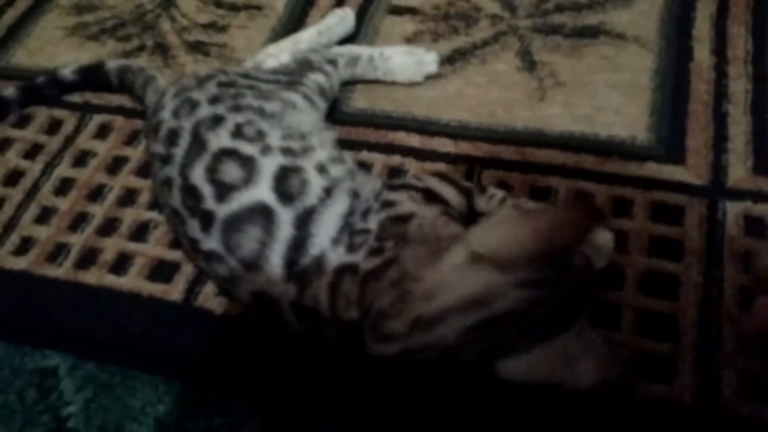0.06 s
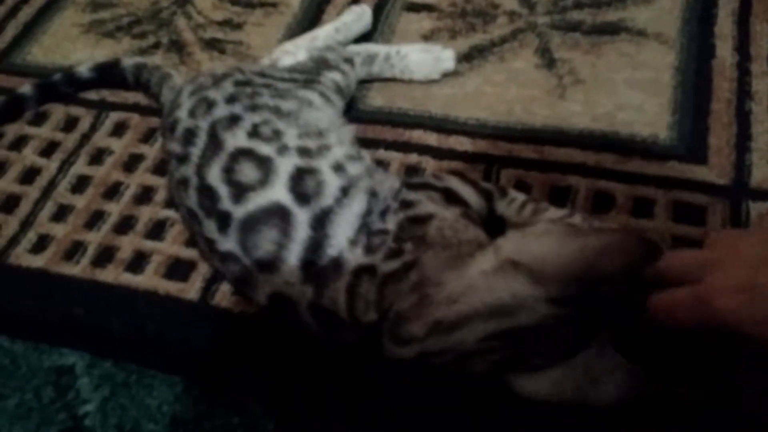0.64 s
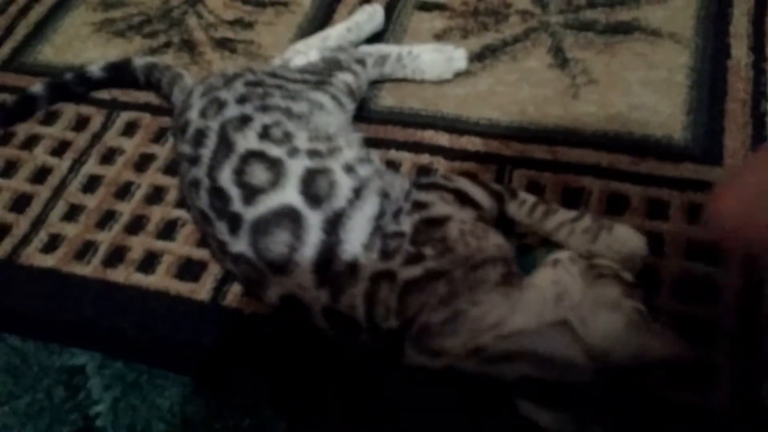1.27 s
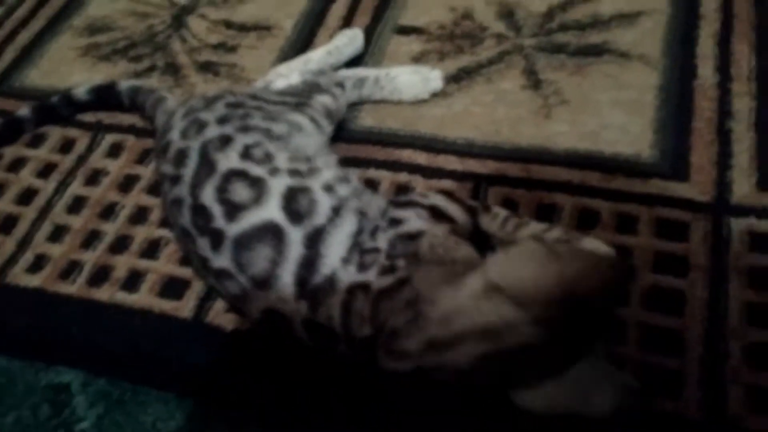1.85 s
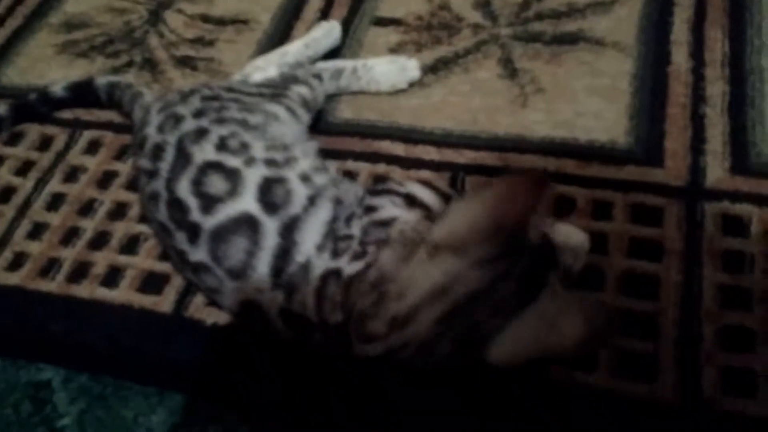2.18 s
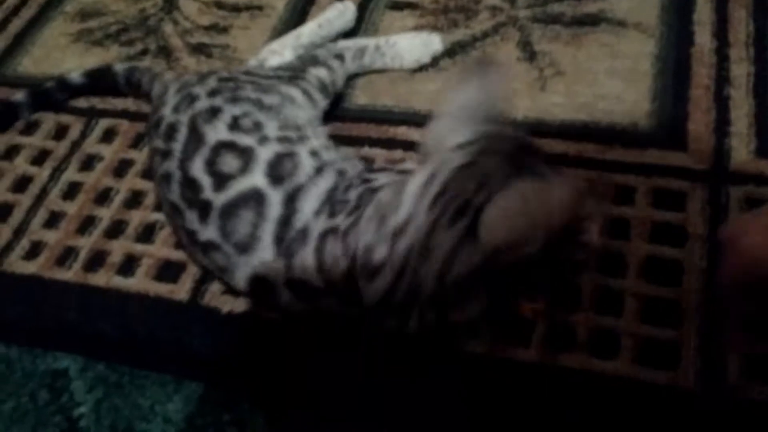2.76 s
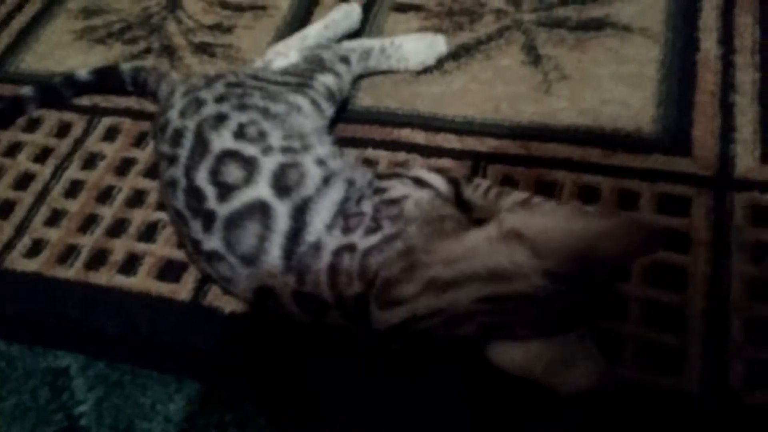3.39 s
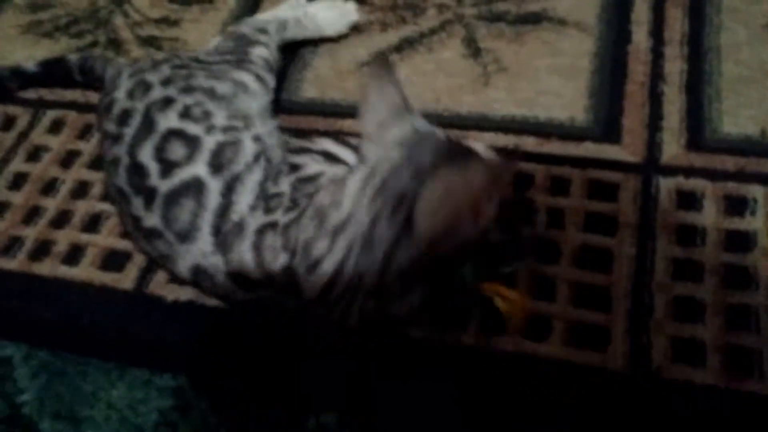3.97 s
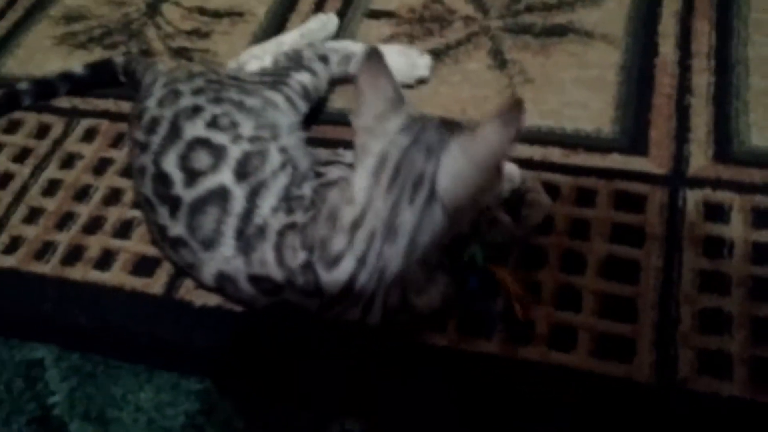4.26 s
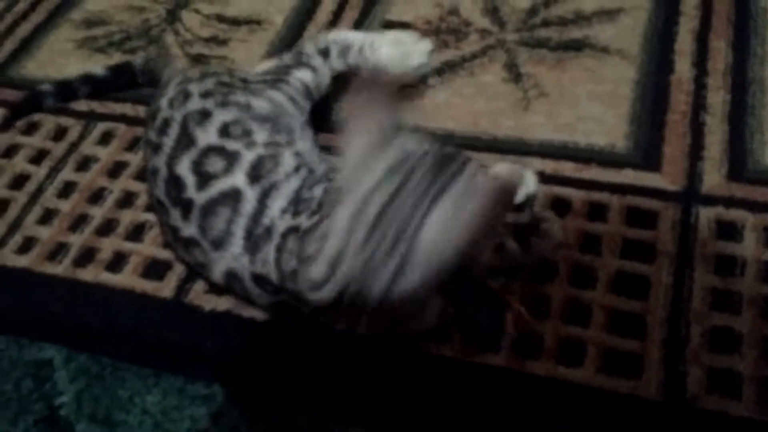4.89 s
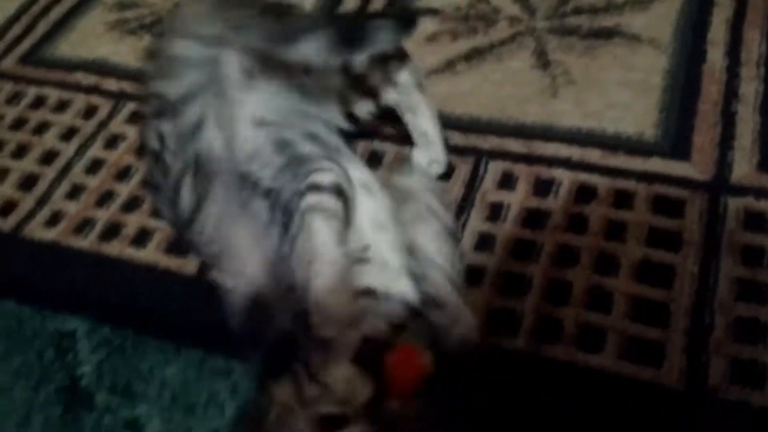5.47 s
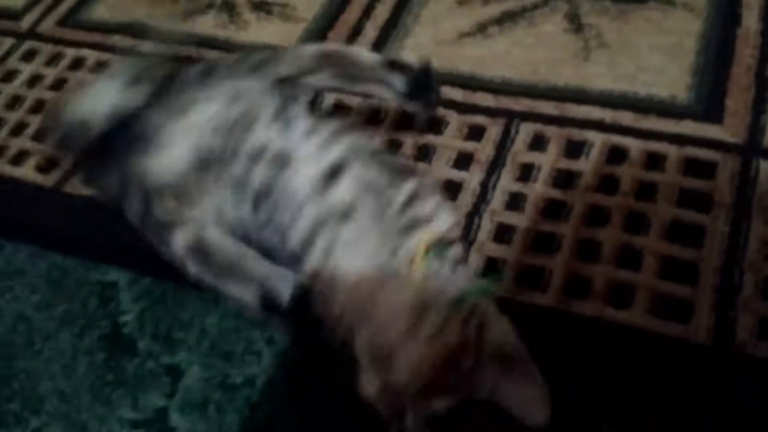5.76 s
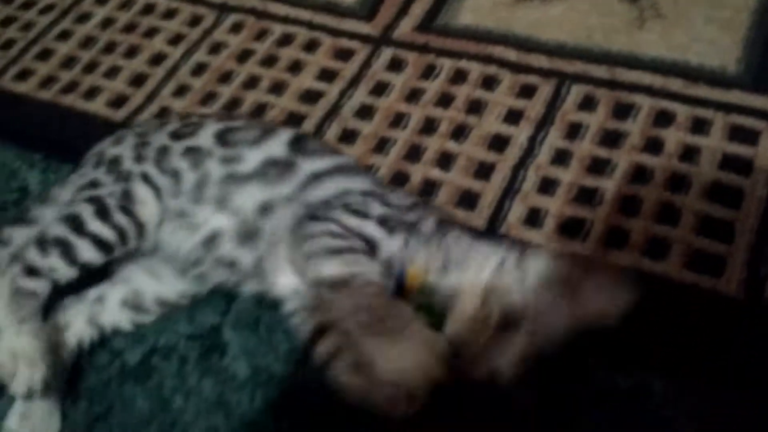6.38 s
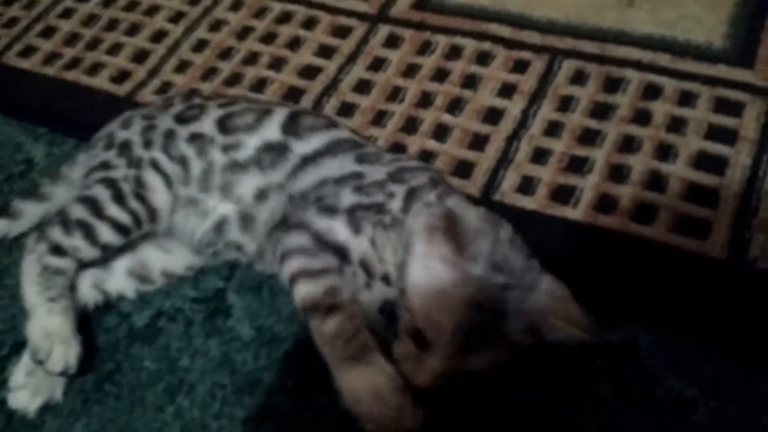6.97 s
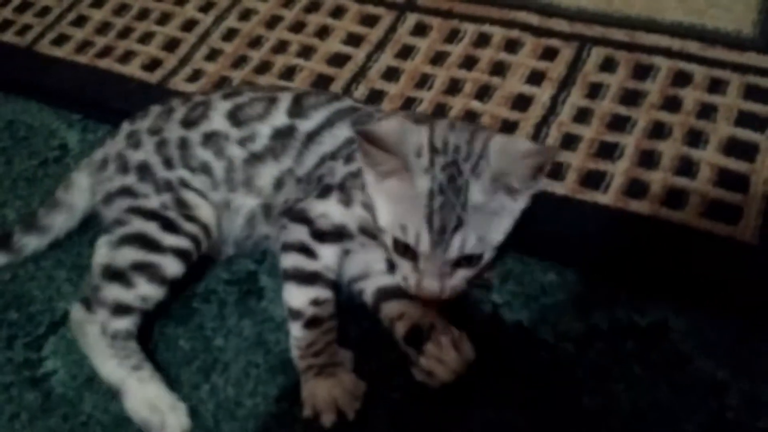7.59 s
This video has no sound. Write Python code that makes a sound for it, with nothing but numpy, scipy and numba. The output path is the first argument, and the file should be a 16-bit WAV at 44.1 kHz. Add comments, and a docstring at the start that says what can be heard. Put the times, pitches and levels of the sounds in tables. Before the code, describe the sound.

A kitten growls twice, low and rough, then sniffs and rolls over on a carpet with rustles and bumps.

```python
"""A kitten growls twice over its toy, sniffs, then rolls over on a carpet with rustles, snags and bumps.
The growl is an uneven train of vocal-fold pulses ringing in the throat and mouth; each time, the mouth
opens fast into a snarl and closes slowly. Underneath sits a quiet room with a little mains hum.
A hand-held camera with two microphone ports adds hiss, handling rumble and a faint regular tick."""
import sys
import numpy as np
from scipy import signal
from scipy.fft import rfft, irfft, next_fast_len
from scipy.io import wavfile
from scipy.ndimage import uniform_filter1d
from numba import njit

SR = 44100
rng = np.random.default_rng(int(sys.argv[2]) if len(sys.argv) > 2 else 0)


def persist_wave(psi):
    """Save psi, clipped to +-1, as 16-bit WAV."""
    counts = np.round(np.clip(psi, -1, 1) * 32767).astype(np.int16)
    wavfile.write(sys.argv[1], SR, np.atleast_2d(counts).T)


N = 336924
TIME = np.arange(N) / SR
LEFT_RIGHT = np.array([[1], [-1]])   # a pan is added on the left and taken off on the right


def from_db(db):
    """Decibels to gain."""
    return 10 ** (np.asarray(db) / 20)


def rms_one(x):
    """Scale to unit power."""
    return x / np.sqrt(np.mean(x ** 2) + 1e-20)


def evened(x):
    """Ride the level to unit power over every few cycles."""
    return x / np.sqrt(np.abs(uniform_filter1d(x ** 2, size=1500)) + 1e-12)


def at_hz(points, hz):
    """Read a curve on a log-frequency axis."""
    f, value = np.transpose(points)
    return np.interp(np.log(hz + 1e-3), np.log(f), value)


def in_time(tables):
    """Each column of several tables as one curve in time."""
    times, *columns = np.transpose(np.concatenate(tables))
    return [np.interp(TIME, times, column) for column in columns]


def swells(tables):
    """A gain envelope from the time and level columns of several tables, silent between them."""
    gain = sum(from_db(np.interp(TIME, *np.transpose(t)[:2], -np.inf, -np.inf)) for t in tables)
    return np.abs(uniform_filter1d(gain, size=200))


def strokes(rows, arch=.9):
    """Arched envelopes of movements that speed up and slow down again."""
    return sum(from_db(db) * np.abs(np.sin(np.pi * np.clip((TIME - start) / length, 0, 1))) ** arch
               for start, length, db in rows)


def burst(start, attack_s, decay_s):
    """An envelope that rises and dies away."""
    age = np.maximum(TIME - start, 0)
    return (1 - np.exp(-age / attack_s)) * np.exp(-np.minimum(age / decay_s, 20))


def waver(rate_hz, depth_db):
    """A factor that wanders at random around 1."""
    return from_db(depth_db * np.interp(TIME * rate_hz, np.arange(1000), rng.standard_normal(1000)))


def coloured(x, spectrum):
    """Shape a signal with an EQ curve; unit power."""
    size = next_fast_len(N)
    gain = from_db(at_hz(spectrum, np.fft.rfftfreq(size, 1 / SR)))
    return rms_one(irfft(rfft(x, size) * gain, size)[..., :N])


def dipped(x, dips):
    """Cut bell-shaped dips into a spectrum."""
    size = next_fast_len(N)
    f = np.fft.rfftfreq(size, 1 / SR)
    bells = [1 - (1 - from_db(db)) * np.exp(-((f - hz) / width) ** 2) for hz, width, db in dips]
    return irfft(rfft(x, size) * np.prod(bells, axis=0), size)[:N]


def butter(x, hz, kind, order=2):
    """Causal Butterworth filter."""
    sos = signal.butter(order, np.minimum(hz, SR * 9 / 20), kind, fs=SR, output="sos")
    return signal.sosfilt(sos, x + 1e-18)


def resonate(x, hz, width_hz):
    """A steady resonance with gain 1 at its peak."""
    r = np.exp(-np.pi * width_hz / SR)
    feedback = [1, -2 * r * np.cos(2 * np.pi * hz / SR), r * r]
    return signal.lfilter(np.array([1, 0, -1]) * (1 - r * r) / 2, feedback, x + 1e-18)


def resonate_twice(x, hz, width_hz):
    """Two equal resonances in series, for steeper skirts."""
    return resonate(resonate(x, hz, width_hz), hz, width_hz)


@njit
def glide(x, hz, width_hz):
    """A resonance whose centre moves."""
    y, r = np.zeros(len(x)), np.exp(-np.pi * width_hz / SR)
    for i in range(2, len(x)):
        drive = (1 - r * r) / 2 * (x[i] - x[i - 2])
        y[i] = drive + 2 * r * np.cos(2 * np.pi * hz[i] / SR) * y[i - 1] - r * r * y[i - 2]
    return y


def add(track, start, sound):
    """Mix a short sound in at a time."""
    i = int(start * SR)
    track[i:i + len(sound)] += sound[:N - i]


# Dark murmur of the room's air: (frequency [Hz], level [dB])
ROOM_TONE_EQ = [(30, 9), (90, -9), (160, -4.5), (225, -0.5), (275, 7), (325, -6), (400, 2), (500, -12),
                (900, -11.5), (1200, -13), (1900, -23.5), (2700, -48), (4200, -21.5), (6500, -26),
                (16000, -38.5)]

def room_tone(level_db=-55):
    """The air in the room, a steady bed of low noise."""
    return from_db(level_db) * coloured(rng.standard_normal(N), ROOM_TONE_EQ)


# Partials of the hum: (frequency [Hz], level [dB])
HUM_PARTIALS = [(120, -65), (600, -77.5)]

def mains_hum():
    """The mains hums in two steady sine tones."""
    return sum(from_db(db) * np.sqrt(2) * np.sin(2 * np.pi * hz * TIME) for hz, db in HUM_PARTIALS)


# The camera's noise floor: (frequency [Hz], level [dB])
HISS_EQ = [(15, -14), (42, 6), (62, 0), (150, -11.5), (500, -14), (1000, -23.5), (2600, -21), (3800, -20),
           (5200, -27), (6500, -23), (9000, -26.5), (16000, -29.5)]

def camera_hiss(level_db=-56, pan_db=-1):
    """Each channel of the camera makes its own steady noise."""
    return from_db(level_db + pan_db * LEFT_RIGHT) * coloured(rng.standard_normal((2, N)), HISS_EQ)


def camera_ticks(start_s=.0285, period_s=.10241, level_db=-54, pan_db=12.5, uneven_db=3):
    """A faint tick from the camera's electronics, on the left, about ten times a second."""
    at = (np.arange(start_s, N / SR, period_s) * SR).astype(int)
    pulses = np.zeros(N)
    pulses[at] = from_db(uneven_db * rng.uniform(-0.69, 1, len(at)))
    tick = resonate_twice(pulses, hz=4100, width_hz=900)
    return tick / np.abs(tick).max() * from_db(level_db + pan_db * LEFT_RIGHT)


# Bumps on the camera: (time [s], level [dB], decay [s])
HANDLING_BUMPS = [(1.058, -43, 0.12), (2.35, -43, 0.038), (2.857, -62, 0.4), (3.595, -43.5, 0.09),
                  (4.87, -48, 0.13), (6.131, -44, 0.14), (7.405, -44, 0.13)]
# Their sub-bass weight: (frequency [Hz], level [dB])
BUMP_EQ = [(15, -33), (30, -11), (41, 11.5), (58, 1), (100, -11), (200, -13), (500, -59), (2000, -68)]

def handling_bumps(attack_s=0.00076, stereo_spread=0.79, pan_db=-3.5):
    """Handling shakes the camera: deep rumbles, partly different in each port."""
    shake = coloured(rng.standard_normal(N) + stereo_spread * rng.standard_normal((2, N)), BUMP_EQ)
    envelope = sum(from_db(db) * burst(start, attack_s, decay) for start, db, decay in HANDLING_BUMPS)
    return shake * from_db(pan_db * LEFT_RIGHT) * envelope


def room_reverb(x, t60_s=0.29, wet_db=-15, predelay_s=.004):
    """The short dull tail of a carpeted room, different on each side."""
    age = np.arange(SR // 3) / SR
    tail = butter(rng.standard_normal((2, len(age))), 3200, "low", order=1)
    tail = tail * np.exp(-np.log(1000) * age / t60_s) * (age > predelay_s)
    tail /= np.sqrt(np.sum(tail ** 2) / 2)
    return from_db(wet_db) * signal.fftconvolve(x[None], tail, axes=1)[:, :N]


# Phase between the microphone ports: (frequency [Hz], left lead [rad])
PORT_LEAD = [(30, 1.5), (250, .8), (800, .75), (1200, 0), (1950, -.2), (2350, -3), (3300, -3.2),
             (3900, -5.8), (4400, -6.4), (5400, -9.3), (7000, -12.6), (8300, -15.3), (9800, -18.7),
             (16000, -30.5)]
# Balance between them: (frequency [Hz], left minus right [dB])
PORT_PAN = [(60, -4), (95, -9), (150, -19.5), (240, -6), (380, -8), (600, -6.5), (950, 0.5), (1650, -5),
            (2200, 22), (2800, 21.5), (3770, -1.5), (6300, -6), (9470, -5.5), (15000, -4)]

def ports(x):
    """Sound reaches the left port later in the treble and weaker in the bass."""
    size = next_fast_len(N + 2000)
    hz = np.fft.rfftfreq(size, 1 / SR)
    lean = from_db(at_hz(PORT_PAN, hz))
    pair = np.array([lean * np.exp(1j * at_hz(PORT_LEAD, hz)), np.ones(len(hz))]) * 2 / (1 + lean)
    return irfft(rfft(x, size) * pair, size)[:, :N]


# Body moves: (time [s], length [s], level [dB])
WEIGHT_SHIFTS = [(.68, 0.066, -54.5), (3.58, 0.2, -54.5), (4.2, 0.51, -58), (5.87, .2, -64),
                 (6.0, 0.4, -56), (6.38, 0.12, -62.5), (7.39, 0.17, -59.5)]
# Their muffled tone: (frequency [Hz], level [dB])
SCUFF_EQ = [(60, -58), (170, -3), (280, -1.5), (340, 1.5), (430, 1), (600, -9), (1300, -17), (2500, -25.5),
            (6000, -80)]

def body_scuffs():
    """Dull scuffs as the kitten shifts its weight."""
    envelope = strokes(WEIGHT_SHIFTS) * waver(rate_hz=28, depth_db=2.5)
    return envelope * coloured(rng.standard_normal(N), SCUFF_EQ)


# The body fall: (time [s], level [dB])
FLOP_HITS = [(5.935, -38.5)]
# Modes of its thud: (frequency [Hz], level [dB], time to fall 60 dB [s])
THUD_MODES = [(90, -4, 0.12), (165, -1.5, 0.053), (343, -6.5, 0.11), (420, -6, 0.074)]

def flop():
    """The kitten flops onto the floor with one damped thud."""
    out, age = np.zeros(N), np.arange(SR // 4) / SR
    thud = sum(from_db(db) * np.exp(-np.log(1000) * age / t60) * np.sin(2 * np.pi * hz * age)
               for hz, db, t60 in THUD_MODES)
    for start, db in FLOP_HITS:
        add(out, start, from_db(db) * thud)
    return out


# Crisp tone of carpet fibres: (frequency [Hz], level [dB])
FIBRE_EQ = [(500, -13), (1400, 4), (2500, 8.5), (3900, 9.5), (7000, 10), (9500, 5), (12000, 0), (14500, 1),
            (16000, -34)]

def fibre_slips(per_s, spread_db):
    """Carpet fibres let go at random, mostly weakly; unit power."""
    sizes = rng.choice([-1, 1], N) * from_db(spread_db * np.minimum(rng.exponential(1, N), 4))
    return coloured((rng.random(N) < per_s / SR) * sizes, FIBRE_EQ)


# Drags over the carpet: (time [s], length [s], level [dB])
CARPET_STROKES = [(0.0, 0.25, -61), (.56, 0.12, -67), (1.94, 0.091, -63), (4.2, 0.21, -64),
                  (4.36, .22, -63), (4.63, 0.24, -76), (4.82, 0.22, -60.5), (5.35, 0.19, -63.5),
                  (5.52, 0.074, -59.5), (5.65, 0.34, -57), (5.83, 0.27, -53), (6.07, 0.16, -56.5),
                  (6.21, 0.37, -59.5), (6.54, 0.077, -61.5), (7.01, 0.13, -59), (7.41, 0.13, -58)]

def rustle(fidget_db=-72):
    """Fur and toy rub the carpet in uneven strokes; single fibres tick faintly throughout."""
    envelope = strokes(CARPET_STROKES) * waver(rate_hz=37, depth_db=2.5)
    rubbing = envelope * fibre_slips(per_s=1100, spread_db=1.5)
    return rubbing + from_db(fidget_db) * fibre_slips(per_s=120, spread_db=4.5)


# Claws and teeth catching: (time [s], crack peak [dB], ring [Hz], dullness [dB], crack decay [s])
CLAW_SNAGS = [(1.655, -51, 6900, 16, .004), (2.878, -44, 6280, 16, .001), (3.0094, -34.5, 6300, 13, 0.0017),
              (3.892, -40.5, 6670, -13, 0.00046), (5.4412, -36, 2900, 1.5, .0004),
              (5.668, -41, 7000, -22, .0007), (5.684, -33.5, 6700, -1.5, 0.0019),
              (5.735, -30.5, 7660, -27, 0.0021), (5.8887, -25.5, 6750, -28, 0.0015),
              (5.8923, -28.5, 7240, -9, .0014), (5.8995, -22, 6700, -28, .0012),
              (5.928, -36, 6490, -8, 0.0026), (5.984, -35, 9500, -15, .0006),
              (6.0423, -44, 4220, 8.5, 0.0017), (6.079, -40, 8000, -22, .0004),
              (7.1323, -35, 6900, -2, 0.00046)]

def snags(tail_db=-22, tail_s=.006, ring_db=-2, knock_db=3, brightening=0.206):
    """A claw lets go with a crack and a scratchy tail; a softer catch has more knock and less top."""
    out, age = np.zeros(N), np.arange(SR // 25) / SR
    for start, db, hz, dull_db, crack_s in CLAW_SNAGS:
        envelope = np.exp(-age / crack_s) + from_db(tail_db) * np.exp(-age / tail_s)
        slip = rng.standard_normal(len(age)) * envelope
        ring = from_db(ring_db) * resonate(slip, hz, width_hz=2400)
        top_hz = max(hz, 6000) * from_db(-brightening * min(dull_db, 0))
        crack = butter(butter(slip + ring, 6700, "high", order=1), top_hz, "low", order=3)
        knock = butter(resonate(slip, hz=1400, width_hz=710), 1830, "low", order=3)
        snag = crack + from_db(knock_db + dull_db) * knock
        add(out, start, from_db(db) * snag / np.abs(crack).max())
    return out


# Teeth on the toy: (time [s], peak [dB], ring [Hz])
TOY_BITES = [(1.219, -45.5, 4230), (3.34, -50, 4100), (3.767, -45.5, 4250), (4.122, -49, 4300),
             (4.749, -46.5, 4230), (6.133, -52, 4170), (6.317, -47, 6500), (6.34, -48, 3970),
             (6.466, -47, 4400), (6.596, -49.5, 4200), (7.11, -48, 4100), (7.571, -38, 3120)]

def toy_clicks(slip_s=0.0025):
    """Teeth slip on the toy: a dry click with a damped ring."""
    out, age = np.zeros(N), np.arange(SR // 40) / SR
    for start, db, hz in TOY_BITES:
        slip = rng.standard_normal(len(age)) * np.exp(-age / slip_s)
        click = resonate_twice(slip, hz, width_hz=850)
        add(out, start, from_db(db) * click / np.abs(click).max())
    return out


# Breaths in: (time [s], length [s], level [dB], fade [dB/s])
SNIFF_BREATHS = [(1.611, 0.14, -55.5, -3), (3.366, 0.52, -54, 21), (6.703, 0.23, -55.5, -4)]
# Their airy tone: (frequency [Hz], level [dB])
SNIFF_EQ = [(600, -18), (1400, 3), (2200, 1.5), (3800, 5.5), (5200, 8), (7000, 10.5), (8500, 6),
            (12500, 1.5), (16000, -23)]

def sniffs(attack_s=.04, release_s=.06):
    """Air hisses in through the kitten's nose; the long breath trails off."""
    flow = np.zeros(N)
    for start, length, db, fade in SNIFF_BREATHS:
        age = TIME - start
        gate = np.clip(age / attack_s, 0, 1) * np.clip((length - age) / release_s, 0, 1)
        flow += from_db(db - fade * np.clip(age, 0, length)) * gate
    return flow * waver(rate_hz=43, depth_db=3.5) * coloured(rng.standard_normal(N), SNIFF_EQ)


# Short closed-mouth grunts: (time [s], level [dB], decay [s], ring [Hz])
GRUNT_PUFFS = [(0.695, -47.5, 0.075, 430), (4.489, -50, 0.046, 410), (7.027, -45.5, 0.05, 402)]

def grunts(attack_s=0.0074, width_hz=70):
    """A puff of rough sound rings in the closed throat."""
    out, air = np.zeros(N), rng.standard_normal(N)
    for start, db, decay, hz in GRUNT_PUFFS:
        ring = evened(resonate(resonate(air, hz, width_hz), hz, 3 * width_hz))
        out += from_db(db) * burst(start, attack_s, decay) * ring
    return out


# The vocal folds, one table per growl: (time [s], pitch [Hz], roughness [factor])
FOLD_CURVES = [
    [(0.95, 165.5, 1.2), (1.06, 181.2, 0.7), (1.11, 174.3, 0.55), (1.17, 179.7, 0.83), (1.22, 153, 0.9),
     (1.28, 177.4, 1.12), (1.38, 175.4, 0.44), (1.44, 162.7, 0.9), (1.475, 170.3, 0.28),
     (1.59, 170.5, 0.51), (1.66, 160.3, 1.45)],
    [(2.44, 156.9, 0.88), (2.6, 139.4, 1.1), (2.76, 145.5, 1.04), (2.84, 172.8, 0.9), (2.92, 207, 1.06),
     (3.0, 199.1, 1), (3.08, 182.8, 0.48), (3.17, 165.3, 0.62), (3.26, 147.4, 0.45), (3.4, 138.4, 0.91),
     (3.55, 125.3, 1.02)],
]

def vocal_folds(jitter_cycles=.082, limp_cycles=.065, shimmer_db=1.9, limp_db=1.2):
    """One pulse a cycle; roughness scales a random scatter and an alternating limp in time and level."""
    pitch, rough = in_time(FOLD_CURVES)
    cycles = np.cumsum(pitch * waver(rate_hz=45, depth_db=.3)) / SR   # pitch wanders a few percent
    at = np.flatnonzero(np.diff(np.floor(cycles)))
    scatter = np.clip(rng.standard_normal((len(at), 2)), -1.7, 1.7) * rough[at, None]
    limp = rough[at] * (-1) ** np.arange(len(at))
    late = (jitter_cycles * scatter[:, 0] + limp_cycles * limp) * SR / pitch[at]
    strength = from_db(shimmer_db * scatter[:, 1] + limp_db * limp)
    pulses = np.zeros(N)
    pulses[np.clip(at + late, 0, N - 1).astype(int)] = strength
    return pulses


def teeth_hiss(puffs, teeth_hz, snarl, wide, level_db=-24, width_hz=750.0):
    """Air hisses at the teeth, growing with the snarl and the mouth's width."""
    hiss = evened(glide(glide(puffs, teeth_hz, width_hz), teeth_hz, width_hz))
    return from_db(level_db) * snarl ** .75 * wide ** .2 * hiss


def nose_buzz(pulses, puffs, snarl, wide, level_db=-27):
    """Pulses and air buzz in the nose, growing with the snarl and the mouth's width."""
    buzz = evened(resonate_twice(rms_one(pulses) + puffs, hz=2600, width_hz=750))
    return from_db(level_db) * snarl ** .6 * wide ** .6 * buzz


# Gritty accents in the growls: (time [s], length [s], level [dB])
RASP_ACCENTS = [(1.043, 0.061, -49.5), (1.09, .12, -56), (2.86, 0.11, -49.5), (3.215, 0.13, -53.5),
                (3.33, 0.094, -56)]

def throat_rasp(puffs):
    """The throat tightens and the puffs of air rasp through it."""
    return strokes(RASP_ACCENTS) * evened(resonate_twice(puffs, hz=730, width_hz=260))


# The low rumble's envelope, one table per growl: (time [s], level [dB])
RUMBLE_LEVELS = [
    [(0.95, -70), (0.988, -47), (1.04, -45.5), (1.062, -35.5), (1.085, -42), (1.18, -40.5), (1.218, -47),
     (1.272, -39.5), (1.29, -43), (1.374, -38), (1.442, -42.5), (1.545, -37.5), (1.598, -42.5),
     (1.618, -49), (1.65, -56)],
    [(2.44, -68), (2.482, -49.5), (2.56, -48), (2.594, -45.5), (2.748, -48.5), (2.865, -41.5), (2.88, -37),
     (2.93, -37.5), (2.946, -43.5), (3.2, -41.5), (3.245, -37), (3.31, -43.5), (3.46, -46), (3.56, -61)],
]
# Throat resonances, strongest with the mouth nearly shut: (frequency [Hz], width [Hz], level [dB])
THROAT_FORMANTS = [(215, 210, 6), (330, 390, 4), (470, 71, 0)]

def throat_rumble(pulses, snarl, wide, puff_hz=299, lag_s=0.00098, closing_s=0.00027, slam_db=2):
    """Rounded puffs ring the throat; in a snarl the folds slam shut, adding depth and a sawtooth edge."""
    age = np.arange(-300, 301) / SR
    spread = (np.pi * puff_hz * (age - lag_s)) ** 2   # the puff peaks just after the folds shut
    flow = signal.fftconvolve(pulses, (1 - 2 * spread) * np.exp(-spread), "same")
    pressed = snarl ** 2 / (snarl ** 2 + from_db(-51) ** 2)   # half pressed at a snarl of -51 dB
    deep, middle, high = [from_db(db) * resonate(flow, hz, width) for hz, width, db in THROAT_FORMANTS]
    rings = ((0.64 + 2 * pressed) * deep + middle + high) / (0.25 + wide) ** .5
    slam = signal.fftconvolve(pulses, -np.exp(-np.abs(age) / closing_s) * (age < 0), "same")
    slam = butter(butter(slam, 81, "high"), 1100, "low", order=1)
    return swells(RUMBLE_LEVELS) * evened(flow + rings + from_db(slam_db) * pressed * slam)


# Mouth resonances: (frequency [multiple of the main one], width [Hz], level [dB])
MOUTH_FORMANTS = [(.5, 305, 7), (.77, 308, 5), (1, 246, 25), (1.3, 400, 9), (1.95, 597, -14)]

def mouth(pulses, puffs, mouth_hz, wide, snap=1.2, air_share=.22):
    """Strong pulses snap shut harder; a wide mouth shakes and lets out more of its side resonances."""
    airy = rms_one(pulses ** snap) + air_share * puffs
    flutter = waver(rate_hz=170, depth_db=.4) ** np.minimum(wide, 1)   # tongue and jaw shake
    low, lower, main, upper, top = [from_db(db) * glide(airy, ratio * mouth_hz * flutter, float(width))
                                    for ratio, width, db in MOUTH_FORMANTS]
    vowel = main - low + wide ** .8 * (top - upper - lower)
    return evened(butter(butter(vowel, 200, "high"), 4300, "low", order=3))


# The snarl, one table per growl: (time [s], level [dB], mouth resonance [Hz], teeth resonance [Hz])
SNARL_CURVES = [
    [(1.02, -76, 1370, 5700), (1.048, -62, 1370, 5500), (1.065, -50, 1390, 5470), (1.18, -52.5, 1600, 6850),
     (1.27, -56, 1380, 6400), (1.37, -56.5, 1240, 5600), (1.47, -64.5, 1187, 5800),
     (1.61, -63.5, 1250, 6070)],
    [(2.55, -79, 1403, 6010), (2.595, -56.5, 1386, 5965), (2.67, -62, 1450, 6230), (2.79, -71, 1422, 6395),
     (2.86, -54, 1370, 5800), (2.878, -39.5, 1460, 6020), (2.93, -37, 1740, 6900), (2.946, -46, 1760, 6800),
     (3.06, -47.5, 1500, 6300), (3.16, -49, 1416, 6113), (3.27, -53, 1280, 6040), (3.37, -56.5, 1370, 6097),
     (3.52, -68, 1320, 6220)],
]

def growl(wide_mouth_hz=1630):
    """Fold pulses, each with a puff of air, ring in throat, nose and mouth and hiss at the teeth."""
    _, mouth_hz, teeth_hz = in_time(SNARL_CURVES)
    snarl = swells(SNARL_CURVES)
    wide = (mouth_hz / wide_mouth_hz) ** 8   # a higher resonance means a much wider mouth
    pulses = vocal_folds()
    puffs = rms_one(butter(pulses, 53, "low", order=1) * rng.standard_normal(N))
    voice = throat_rumble(pulses, snarl, wide) + snarl * mouth(pulses, puffs, mouth_hz, wide)
    edge = nose_buzz(pulses, puffs, snarl, wide) + teeth_hiss(puffs, teeth_hz, snarl, wide)
    return (voice + throat_rasp(puffs) + edge) * waver(rate_hz=22, depth_db=0.93)


def scene():
    """The kitten and the room at the two ports, plus hum and the camera's own noises."""
    kitten = growl() + grunts() + sniffs() + rustle() + snags() + body_scuffs() + flop()
    air = room_tone()
    noise_floor = mains_hum() + camera_hiss()
    at_ports = ports(kitten + room_reverb(kitten) + toy_clicks() + air)
    return at_ports + noise_floor + handling_bumps() + camera_ticks()


# Dips in the sum of the ports: (frequency [Hz], half width [Hz], gain [dB])
MID_DIPS = [(2640, 391, -72), (5390, 170, 0)]
# Dips in their difference: (frequency [Hz], half width [Hz], gain [dB])
SIDE_DIPS = [(1356, 260, -44), (3840, 300, -34)]

def record(dry):
    """The camera's stereo widening notches mid and side, and the top is cut steeply."""
    left, right = dry
    mid = dipped((left + right) / 2, MID_DIPS)
    side = dipped((left - right) / 2, SIDE_DIPS)
    high_cut = signal.ellip(10, .1, 70, 15750, fs=SR, output="sos")
    return signal.sosfilt(high_cut, [mid + side, mid - side])


dry = scene()
out = record(dry)
persist_wave(out)
```